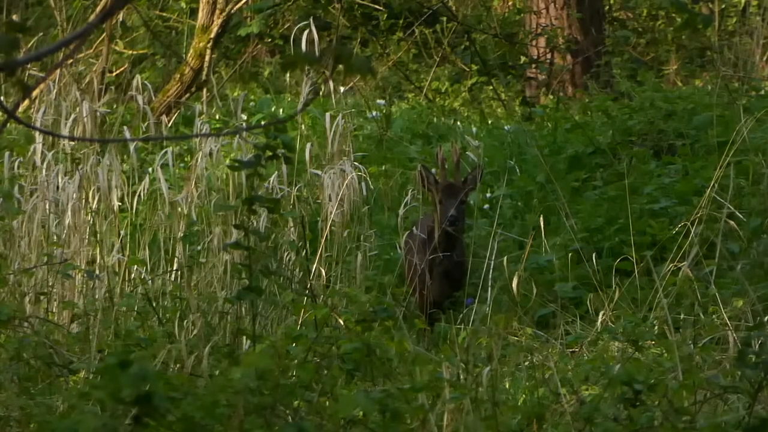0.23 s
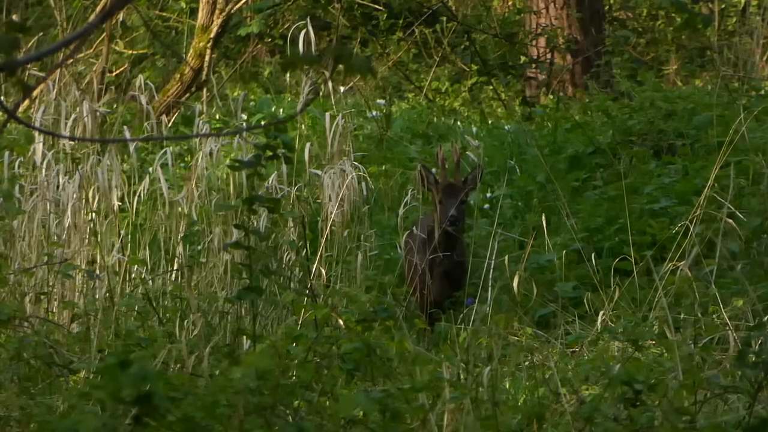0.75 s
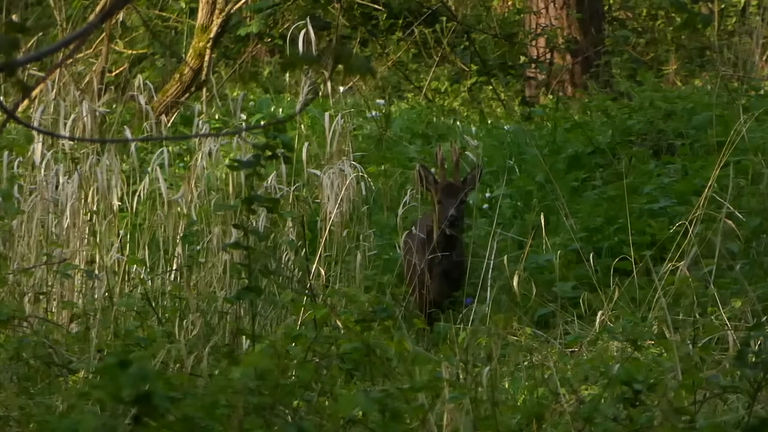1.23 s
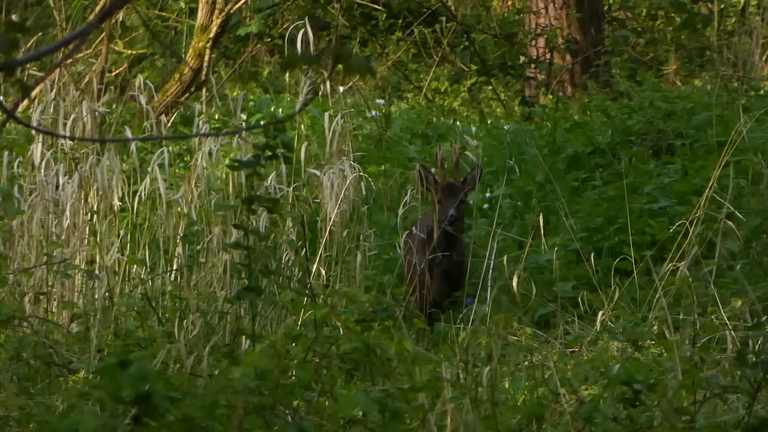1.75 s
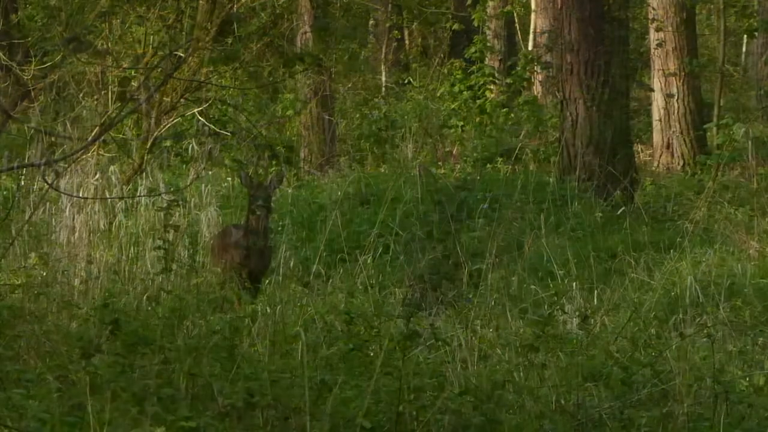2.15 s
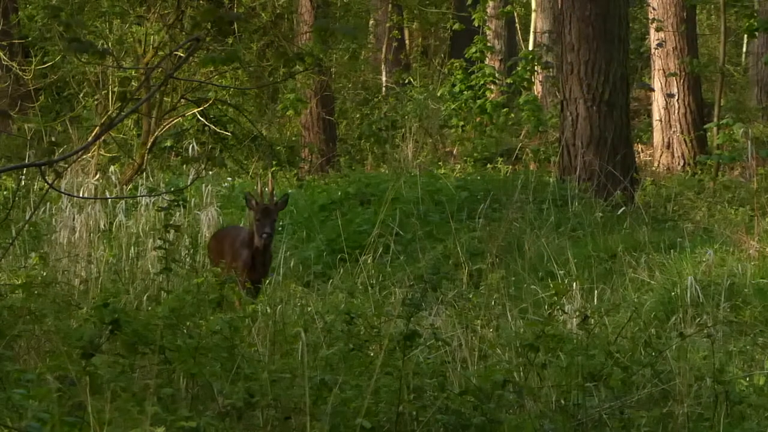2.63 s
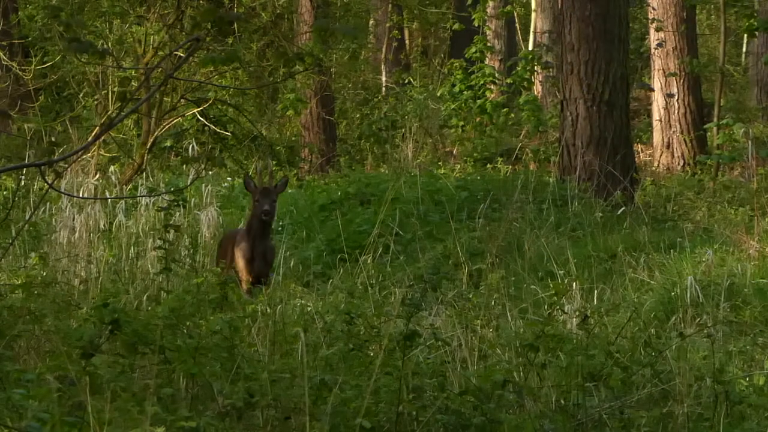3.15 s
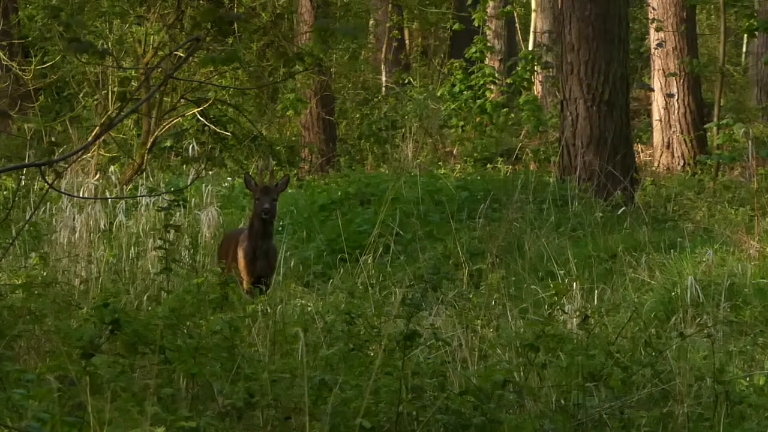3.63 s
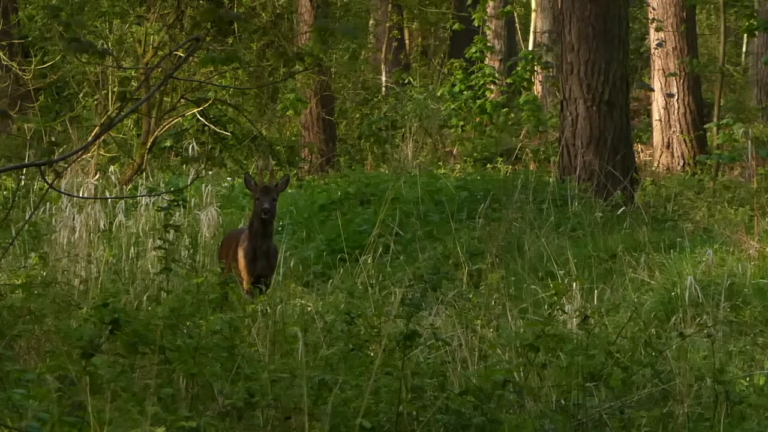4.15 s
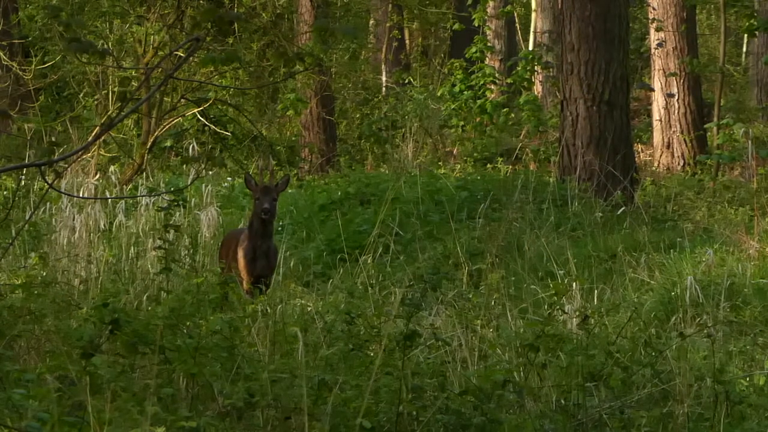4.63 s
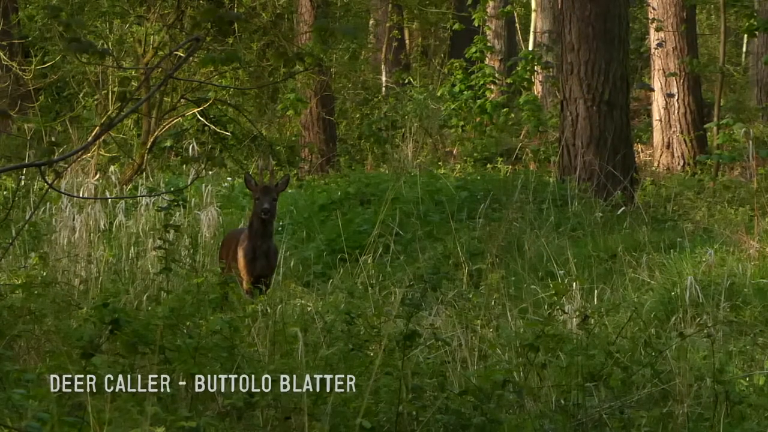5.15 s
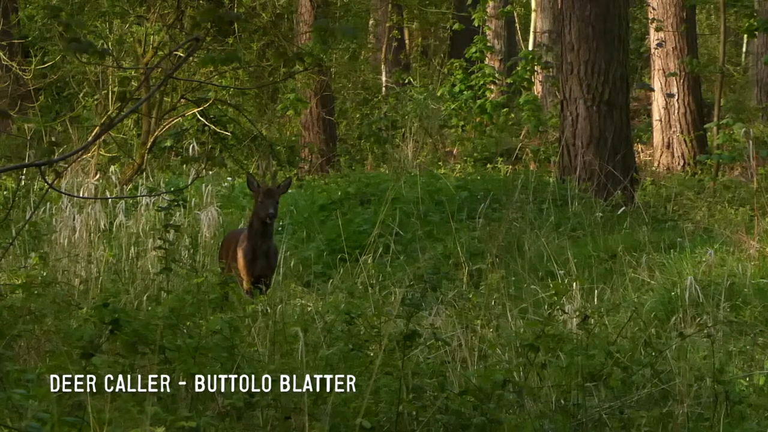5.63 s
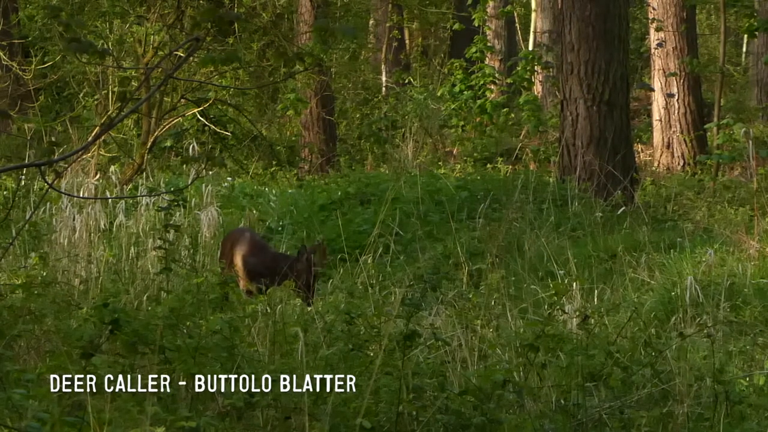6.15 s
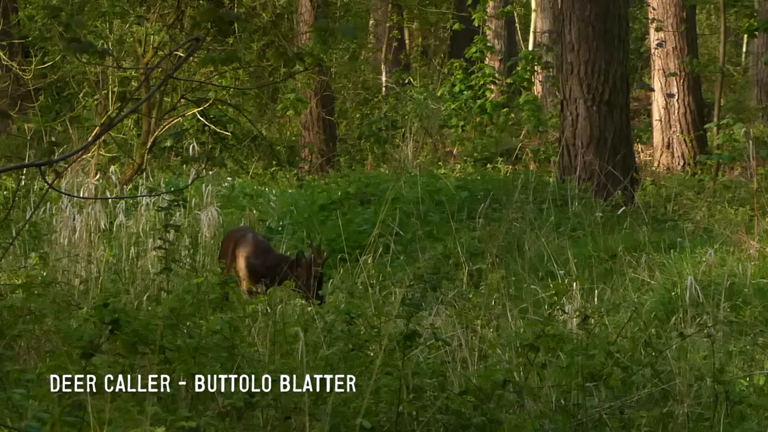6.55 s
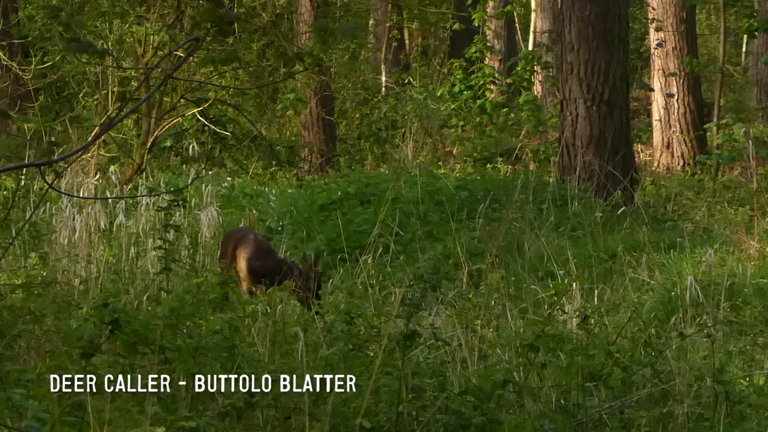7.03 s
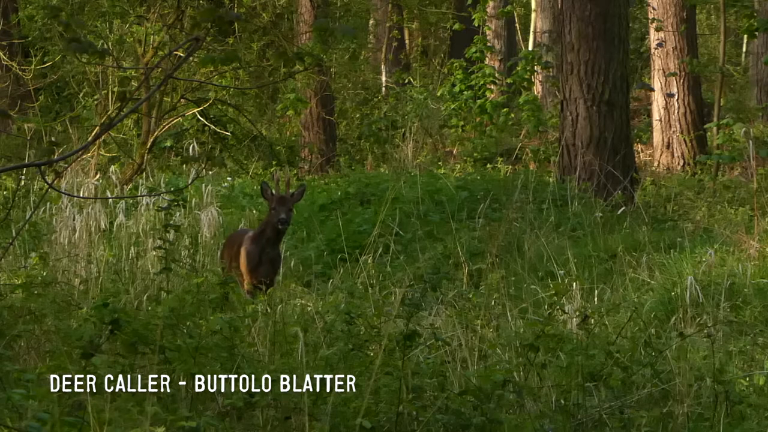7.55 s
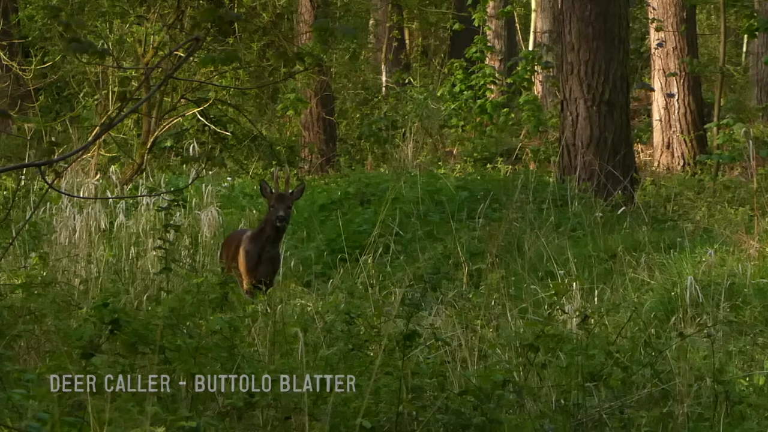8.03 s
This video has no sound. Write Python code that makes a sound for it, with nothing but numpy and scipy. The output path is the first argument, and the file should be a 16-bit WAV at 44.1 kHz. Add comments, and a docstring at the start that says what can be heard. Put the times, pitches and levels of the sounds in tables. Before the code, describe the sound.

One loud squeak from a squeeze-bulb deer caller cuts through quiet woodland birdsong and a faint distant roar.

```python
"""A deer caller in a wood

A squeeze-bulb deer caller is pressed once close by. Its tight reed sings a pure high note, then goes
slack and slides down into separate slaps that ring the bulb and horn. Songbirds and a far pigeon call
among the trees, which send back a soft echo, over a low far-off roar and a faint hiss."""
import sys
import numpy as np
from scipy import signal
from scipy.fft import rfft, irfft, next_fast_len
from scipy.io import wavfile

SR = 44100
rng = np.random.default_rng(int(sys.argv[2]) if len(sys.argv) > 2 else 0)


def wav_out(sig):
    """Save sig, one row per channel (or a flat mono array), as 16-bit PCM at SR to the path in sys.argv[1]."""
    wavfile.write(sys.argv[1], SR, np.round(np.clip(np.atleast_2d(sig).T, -1, 1) * 32767).astype(np.int16))


N = 365588
T = np.arange(N) / SR
ECHO_FADE_S, ECHO_GAP_S = 1.16, 0.027   # the trees' echo: time to fall by 60 dB, wait before it starts
# how loud the background is over time: t/s, far roar/dB, far birds/dB, hiss/dB
BACKGROUND_LEVELS = [(0, -53.5, -57.5, -68), (1.5, -53, -62, -70), (1.8, -49, -60.5, -67),
                     (2.3, -50, -70, -70), (3.2, -51.5, -66, -69.5), (4.5, -50.5, -61.5, -69.5),
                     (6.7, -49.5, -65.5, -69.5), (8.29, -48, -65.5, -69.5)]


def amp(db):
    """Turn decibels into a number to multiply a sound by."""
    return 10 ** (np.asarray(db) / 20)


def rms_one(x):
    """Scale a sound so that its average strength (rms) is 1."""
    return x / np.sqrt(np.mean(x ** 2) + 1e-20)


def in_time(rows, t=T):
    """Join a table's rows by straight lines in time: one curve for each column after the first."""
    times, *columns = np.transpose(rows)
    return [np.interp(t, times, column) for column in columns]


def at_hz(points, hz):
    """Read a table between its frequencies, giving every octave the same room."""
    freqs, values = np.transpose(points)
    return np.interp(np.log(hz), np.log(freqs), values)


def pan(x, lean_db):
    """Make the left channel lean_db louder than the right."""
    return x * amp([[lean_db / 2], [-lean_db / 2]])


def drift(rate, size=N):
    """A wandering curve: `rate` random values a second, joined by lines."""
    return np.interp(np.arange(size) * rate / SR, np.arange(2000), rng.standard_normal(2000))


def resonance(x, hz, width_hz):
    """Let through the band around hz, as a ringing hollow does."""
    r = np.exp(-np.pi * width_hz / SR)
    feedback = [1, -2 * r * np.cos(2 * np.pi * hz / SR), r * r]
    return signal.lfilter([(1 - r * r) / 2, 0, (r * r - 1) / 2], feedback, x)


def steep_band(x, hz, width_hz):
    """The same resonance twice, for a band with steeper sides."""
    return resonance(resonance(x, hz, width_hz), hz, width_hz)


def shaped_noise(spectrum):
    """Stereo noise of strength 1, with lows and highs balanced as in the given table."""
    # how alike the two channels are: f/Hz, likeness (0 unrelated, 1 the same)
    likeness = [(150, .0), (300, 0.52), (600, 0.44), (3000, 0.4), (12000, .5)]
    # how much louder the left is than the right: f/Hz, level/dB
    lean = [(60, 1), (380, -2.5), (2380, 0), (15000, 0)]
    size = next_fast_len(N)
    hz = np.maximum(np.fft.rfftfreq(size, 1 / SR), 1)
    mid, side = rfft(rng.standard_normal((2, size)))
    alike = at_hz(likeness, hz)
    pair = np.sqrt(1 + alike) * mid + np.sqrt(1 - alike) * side * [[1], [-1]]
    gain = amp(at_hz(spectrum, hz) + at_hz(lean, hz) / 2 * [[1], [-1]])
    return rms_one(irfft(pair * gain, size)[:, :N])


def wood_echo(x, alike, fade_s, gap_s):
    """Sound bounces off many surfaces and comes back as a dying blur, 60 dB down after fade_s."""
    t = np.arange(int(1.5 * SR)) / SR
    mid, side = rng.standard_normal((2, len(t)))
    spread = np.sqrt((1 - alike) / (1 + alike))
    tail = (mid + spread * side * [[1], [-1]]) * amp(-60 * t / fade_s) * (t > gap_s)
    return signal.fftconvolve(x, tail / np.sqrt(np.sum(tail ** 2) / 2), axes=1)[:, :N]


def far_roar(level_db):
    """A low far-off roar: deep noise whose level wavers slightly."""
    # tone colour of the roar: f/Hz, level/dB
    spectrum = [(12, -80), (20, -41.5), (98, -14), (135, -13), (248, -6.5), (484, -2.5), (761, -3),
                (1270, -15), (2200, -30.5), (2860, -53), (4840, -120)]
    return amp(level_db + 0.41 * drift(8)) * shaped_noise(spectrum)


def far_birds(level_db):
    """Many distant birds blur into a band of noise that swells and sinks."""
    # tone colour of the blur: f/Hz, level/dB
    spectrum = [(1180, -33.5), (2000, -3.5), (3170, 2), (4740, -2), (5150, 1.5), (7500, -18), (9750, -39),
                (16500, -120)]
    return amp(level_db + 1.5 * drift(6)) * shaped_noise(spectrum)


def faint_hiss(level_db):
    """Thin, high noise all round."""
    # tone colour of the hiss: f/Hz, level/dB
    spectrum = [(4120, -30), (7000, 1.5), (8050, -2.5), (10200, 0.5), (14100, -9), (15500, -8.5)]
    return amp(level_db) * shaped_noise(spectrum)


def low_hum():
    """A low hum comes and goes: noise in so narrow a band that it sounds like a wavering note."""
    # rise and fall of the hum: t/s, level/dB
    swell = [(3.5, -100), (3.75, -75), (4.4, -76), (4.6, -100)]
    level_db, = in_time(swell)
    return amp(level_db) * rms_one(steep_band(rng.standard_normal(N), hz=88.8, width_hz=12))


def rasps():
    """Short, smooth swells of very high noise."""
    # each rasp: t/s, length/s, level/dB
    bursts = [(2.32, .07, -76), (2.443, .1, -75), (2.61, .12, -72), (2.77, .08, -75), (2.883, .1, -76)]
    swell = sum(amp(db) * np.exp(-((T - s - length / 2) / (length / 2)) ** 2) for s, length, db in bursts)
    noise = steep_band(rng.standard_normal(N), hz=12900, width_hz=1100)
    return pan(swell * rms_one(noise), 3.6)


def pigeon_coos():
    """A far pigeon's low notes, each sagging a little in pitch; rows for glides()."""
    # each coo: t/s, length/s, end f/Hz, level/dB
    coos = [(7.14, .28, 500, -57.5), (7.68, .16, 462, -57), (8.1, .19, 448, -59)]
    sag, bend, echo_db = .03, 1, 0.5
    return [(s, length, hz * (1 + sag), hz, bend, echo_db, db) for s, length, hz, db in coos]


def songbird_whistles():
    """Songbirds whistle notes that slide from one pitch to another; rows for glides()."""
    # a near bird whips up to a held note: t/s, length/s, level/dB
    whips = [(2.931, .13, -61), (3.202, .075, -53.5), (5.468, .077, -53.5), (5.692, .085, -55),
             (6.005, .062, -50)]
    # thin high whistles: t/s, length/s, level/dB
    seeps = [(2.042, .14, -69), (2.955, .15, -66), (3.42, .24, -69), (3.979, .18, -68.5), (5.991, .2, -73),
             (6.704, .17, -72), (7.042, .19, -71.5), (7.779, .22, -65)]
    # shape of a whip, a thin whistle and a chip: start f/Hz, end f/Hz, bend, echo over direct/dB
    whip_shape = (2450, 4370, 9, -5.5)
    seep_shape = (7170, 7510, 3.3, -4)
    chip_shape = (5780, 4950, 1.6, -3)
    # chirps that drop and level off: t/s, start f/Hz, end f/Hz, level/dB
    hooks = [(5.995, 6500, 5150, -64), (6.266, 6000, 5200, -64), (6.551, 6500, 5520, -66),
             (6.884, 6900, 5140, -61), (7.161, 6940, 5390, -69), (7.503, 6900, 5600, -60),
             (7.854, 7160, 5650, -61), (8.196, 7100, 5550, -61)]
    # quick sweeps of a song: t/s, length/s, start f/Hz, end f/Hz, bend, level/dB
    sweeps = [(.061, .077, 6940, 4750, .9, -53.5), (.19, .064, 6800, 4400, .9, -55),
              (.3, .09, 6900, 3700, 1.4, -66), (.413, .075, 3770, 6200, .55, -58),
              (1.21, .075, 6900, 5500, .65, -62), (1.287, .04, 5460, 7300, 1.2, -67),
              (1.34, .14, 7300, 6000, .55, -67), (1.475, .065, 6000, 3400, 1.0, -60),
              (1.615, .095, 6600, 5240, .7, -59), (1.72, .028, 5300, 3700, .8, -60),
              (1.898, .034, 5610, 4150, .8, -60), (2.088, .03, 5800, 4170, .9, -67),
              (2.925, .02, 4500, 6900, 1.1, -68), (3.192, .02, 4500, 6900, 1.1, -68)]
    # flute-like notes from farther off: t/s, length/s, start f/Hz, end f/Hz, level/dB
    flutes = [(0, .03, 6300, 5000, -58), (.15, .55, 2470, 2490, -67), (.891, .38, 2490, 2450, -64.5),
              (.97, .05, 3950, 3700, -67), (1.1, .3, 2950, 2600, -71), (1.656, .37, 2420, 2370, -68),
              (2.136, .19, 2410, 2466, -76), (2.545, .27, 2343, 2480, -73), (2.955, .19, 2420, 2517, -72),
              (3.3, .15, 3200, 2520, -66), (3.7, .12, 2800, 2420, -67), (3.827, .066, 5170, 5100, -73),
              (3.89, .09, 3620, 3480, -60), (3.95, .055, 4360, 4220, -57), (3.965, .04, 4000, 2900, -61),
              (4.125, .06, 3030, 3100, -61), (4.2, .12, 2800, 2450, -68), (5.363, .11, 6230, 5900, -69),
              (5.83, .08, 3310, 3250, -71), (6.22, .12, 3250, 2950, -71), (7.056, .06, 3290, 3240, -69),
              (8.102, .15, 5750, 5790, -68)]
    chip_s, flick_s, flick_hz = .027, .018, 5400
    hook_s, hook_bend, flute_bend = .042, 4, 1.2
    hook_echo_db, sweep_echo_db, flute_echo_db = 5, -1.5, 6
    notes = [(s, length, *whip_shape, db) for s, length, db in whips]
    notes += [(s, length, *seep_shape, db) for s, length, db in seeps]
    # seven evenly spaced chips, each 1 dB louder than the last and ending in an upward flick
    chips = [(.752 + k * .0805, -65 + k) for k in range(7)]
    _, low_hz, _, chip_echo_db = chip_shape
    notes += [(s, chip_s, *chip_shape, db) for s, db in chips]
    notes += [(s + chip_s, flick_s, low_hz, flick_hz, 1, chip_echo_db, db) for s, db in chips]
    notes += [(s, hook_s, *pitches, hook_bend, hook_echo_db, db) for s, *pitches, db in hooks]
    notes += [(*glide, sweep_echo_db, db) for *glide, db in sweeps]
    notes += [(*glide, flute_bend, flute_echo_db, db) for *glide, db in flutes]
    return notes


def glides(notes):
    """Sliding bird notes: a higher bend nears the end pitch sooner, and longer notes warble more."""
    for s, length, start_hz, end_hz, bend, echo_over_db, direct_db in notes:
        warble_hz = min(75, .018 * end_hz) * min(length / .15, 1) ** 2
        remaining = np.linspace(1, 0, round(length * SR))
        hz = end_hz + (start_hz - end_hz) * remaining ** bend + warble_hz * drift(120, len(remaining))
        yield s, hz, direct_db, direct_db + echo_over_db


def slurs():
    """Long bird notes that hold, slide down and hold again."""
    # each note: t/s, level/dB
    notes = [(7.188, -62.5), (7.735, -58.5)]
    high_hz, low_hz, middle_s, slide_s, echo_over_db = 3820, 3110, .105, .04, 7
    t = np.arange(round(.33 * SR)) / SR
    hz = low_hz + (high_hz - low_hz) / (1 + np.exp((t - middle_s) / slide_s))
    for s, direct_db in notes:
        yield s, hz + 65 * drift(120, len(t)), direct_db, direct_db + echo_over_db


def trills():
    """Bird notes whose pitch swings quickly up and down."""
    # each trill: t/s, length/s, start f/Hz, end f/Hz, swing/Hz, rate/Hz, unevenness/rad, echo level/dB
    notes = [(2.446, 0.51, 5960, 5860, 493, 36, 2.5, -74), (3.3, .55, 2900, 2700, 330, 25, 3.5, -67),
             (3.93, .3, 3500, 3000, 500, 25, 3.5, -63), (4.34, 0.26, 6800, 6700, 760, 28, 3.25, -64.5),
             (4.697, 0.65, 6860, 6070, 518, 36, 3.5, -63), (6.69, 0.13, 4134, 4140, 417, 39, 3.42, -63.5),
             (6.98, .3, 5800, 5600, 550, 30, 3.5, -65), (7.53, .12, 5500, 5400, 500, 30, 3.5, -62),
             (7.842, .23, 8100, 7970, 550, 24, 0.11, -75.5), (8.06, .15, 5400, 5400, 350, 30, 3.5, -64)]
    for s, length, start_hz, end_hz, swing_hz, rate, uneven, echo_db in notes:
        t = np.arange(round(length * SR)) / SR
        swing = np.sin(2 * np.pi * rate * t + uneven * drift(30, len(t)))
        hz = start_hz + (end_hz - start_hz) * t / length + swing_hz * swing
        # even trills come from near, uneven ones arrive mostly by way of the trees
        yield s, hz, echo_db + 4 - 2.8 * uneven, echo_db


def birds():
    """Each bird note is one pure tone, heard directly, smeared by leaves and echoed by the trees."""
    voices = [*glides(songbird_whistles()), *glides(pigeon_coos()), *slurs(), *trills()]
    direct, echo = np.zeros((2, N))
    for s, hz, direct_db, echo_db in voices:
        at = round(s * SR)
        hz = hz[:N - at]
        t = np.arange(len(hz)) / SR
        shape = np.minimum(1, np.minimum(t / .007, (t[-1] - t) / (0.1 * t[-1])))   # fade in and out
        flutter = amp(2.5 * drift(60, len(hz)))
        note = np.sqrt(2) * np.sin(2 * np.pi * np.cumsum(hz) / SR) * shape * flutter
        direct[at:at + len(hz)] += amp(direct_db) * note
        echo[at:at + len(hz)] += amp(echo_db) * note
    direct, echo = pan(direct, .5), pan(echo, .5)
    leaves = amp(-6) * wood_echo(direct, alike=.8, fade_s=.15, gap_s=.002)
    trees = wood_echo(echo, alike=.8, fade_s=ECHO_FADE_S, gap_s=ECHO_GAP_S)
    return direct + leaves + trees


def tight_reed(t, hz, phase):
    """The tight reed swings smoothly, giving an almost pure note that weakens as its pitch drops."""
    # the main note, then its overtones at 2, 3, ... times the pitch: level/dB
    overtones = [0, -10.5, -32, -39, -62, -63, -51, -59, -62]
    stir_s, full_s, tire_s = 4.728, 4.761, 5.0
    stir_db, full_db, rounding_db = -46.5, -13.9, 2.5
    tight_hz, loss_db_per_hz = 1594, .05
    # the swing wakes slowly, then fast, and rounds off into a held note; slopes are in dB a second
    waking_db = np.maximum(stir_db + 500 * (t - stir_s), full_db + 1000 * (t - full_s))
    held_db = full_db - 5 * (t - full_s)
    swing_db = -rounding_db * np.logaddexp(-waking_db / rounding_db, -held_db / rounding_db)
    swing_db -= (60 * (t - tire_s) + loss_db_per_hz * np.maximum(tight_hz - hz, 0)) * (t > tire_s)
    below_peak_db = swing_db - swing_db.max()
    tone = 0
    for k, level_db in enumerate(overtones):
        # overtones grow faster than the main note, and the upper ones waver as the squeeze changes
        level_db = level_db + min(k, 3) * .5 * below_peak_db + (k > 1) * 2.5 * drift(14, len(t))
        tone = tone + pan(amp(level_db) * np.cos((k + 1) * phase), 2 if k == 1 else 0)
    return np.sqrt(2) * amp(swing_db) * tone


def air_squirts(strength, phase):
    """Air squirts out with each slap of the reed and hisses through narrow passages."""
    # the band each passage hisses in: f/Hz, width/Hz, level/dB
    passages = [(4600, 700, -15), (5600, 700, -13), (7800, 600, -27), (10000, 1500, -33),
                (12000, 1200, -22), (14200, 1500, -30)]
    mid, side = rng.standard_normal((2, len(phase)))
    pulses = 6 * np.exp(1.5 * (np.cos(phase) - 1))
    squirts = strength * pulses * (mid + .5 * side * [[1], [-1]])
    return pan(sum(amp(db) * steep_band(squirts, f, width) for f, width, db in passages), 2)


def slack_reed(t, hz, phase):
    """The slack reed slaps shut once a swing, and each slap rings the bulb and horn."""
    # where bulb and horn ring: f/Hz, width/Hz, level/dB
    horn = [(250, 540, 0), (597, 450, -2.5), (1830, 730, 10), (2794, 880, -3.5)]
    from_s, to_s, rise_db_per_s, fall_db_per_s = 5.045, 5.079, 1400, 560
    puff_hz, edge_top_hz = 2100, 5950
    slap_db = -24 - rise_db_per_s * np.maximum(from_s - t, 0) - fall_db_per_s * np.maximum(t - to_s, 0)
    strength = amp(slap_db + drift(400, len(t))) * np.sqrt(hz / 600)
    slap_phase = phase + .05 * drift(500, len(t))   # slaps come a little early or late
    # the soft part of a slap carries little above puff_hz
    puffs = sum(np.cos(k * slap_phase) * np.exp(-(k * hz / puff_hz) ** 2 / 2) for k in range(1, 50))
    body = sum(amp(db) * resonance(strength * puffs, f, width) for f, width, db in horn)
    # its hard edge rings in the mouth of the horn
    edges = sum(np.cos(k * slap_phase) * (k * hz < edge_top_hz) for k in range(1, 50))
    mouth = amp(-12.5) * steep_band(strength * edges, hz=5100, width_hz=1300)
    return body + mouth + air_squirts(strength, phase)


def deer_caller():
    """One squeeze of the bulb blows air past a reed, which is first tight and then slack."""
    # pitch of the reed through squeeze and release: t/s, f/Hz
    reed_pitch = [(4.75, 1525), (4.766, 1577), (4.79, 1589), (4.92, 1595), (5.0, 1592), (5.018, 1534),
                  (5.028, 1385), (5.036, 1215), (5.043, 950), (5.059, 716), (5.075, 565), (5.087, 478),
                  (5.089, 365), (5.1, 285), (5.13, 211)]
    start, end = round(4.65 * SR), round(5.2 * SR)
    t = T[start:end]
    hz, = in_time(reed_pitch, t)
    phase = 2 * np.pi * np.cumsum(hz) / SR
    sound = np.zeros((2, N))
    sound[:, start:end] = tight_reed(t, hz, phase) + slack_reed(t, hz, phase)
    return sound


def scene():
    """The caller close by with its echoes, birds in the trees, background all round."""
    caller = deer_caller()
    ground = amp(-21) * wood_echo(caller, alike=.1, fade_s=.12, gap_s=.003)   # answers at once
    trunks = amp(-27) * wood_echo(caller, alike=.6, fade_s=ECHO_FADE_S, gap_s=ECHO_GAP_S)
    foreground = caller + ground + trunks + birds() + rasps()
    roar_db, far_birds_db, hiss_db = in_time(BACKGROUND_LEVELS)
    return foreground + low_hum() + far_roar(roar_db) + far_birds(far_birds_db) + faint_hiss(hiss_db)


def record(dry):
    """Cut away the very highest treble."""
    cutoff_hz = 15600
    return signal.sosfilt(signal.ellip(12, .5, 70, cutoff_hz, fs=SR, output="sos"), dry)


dry = scene()
out = record(dry)
wav_out(out)
```